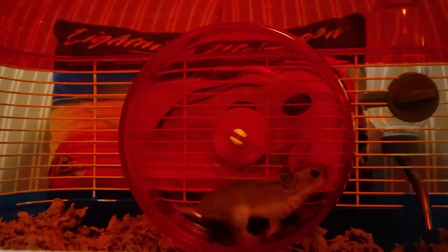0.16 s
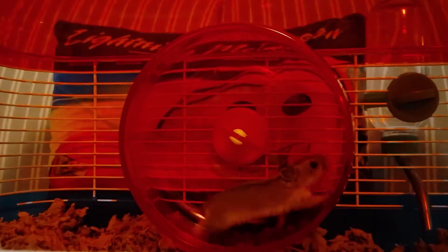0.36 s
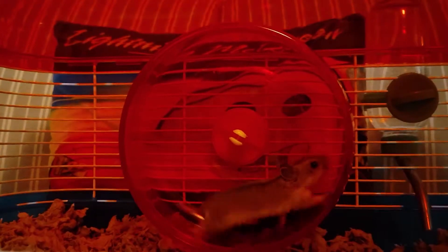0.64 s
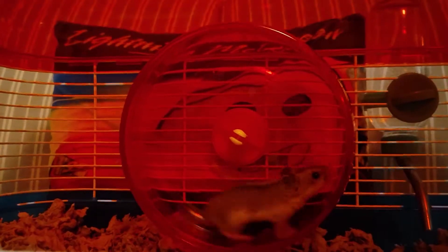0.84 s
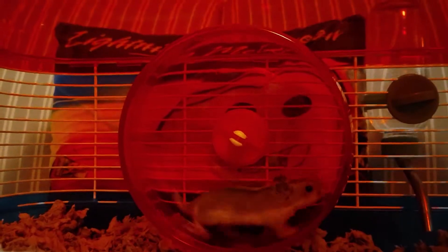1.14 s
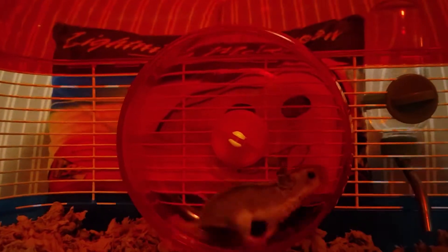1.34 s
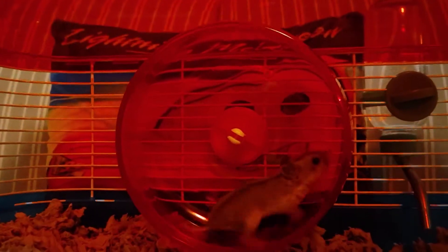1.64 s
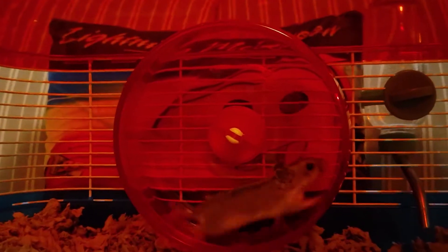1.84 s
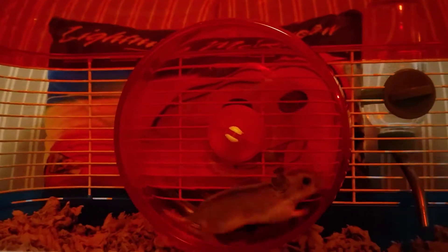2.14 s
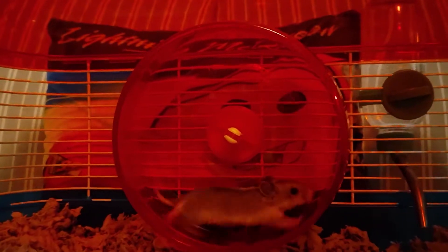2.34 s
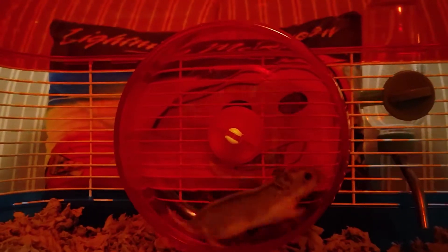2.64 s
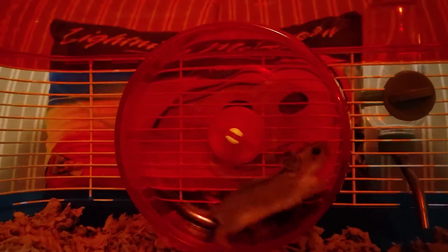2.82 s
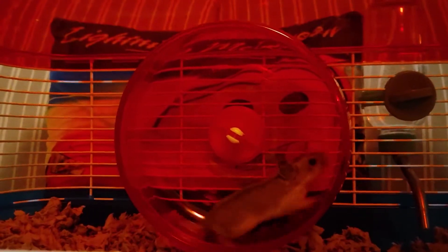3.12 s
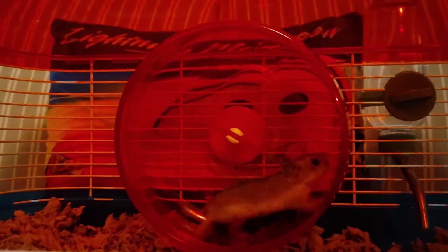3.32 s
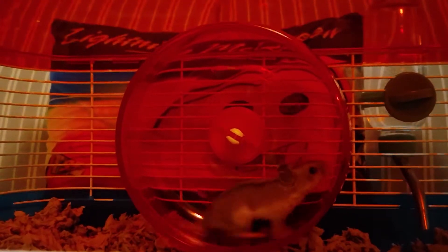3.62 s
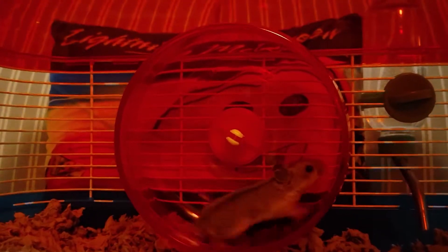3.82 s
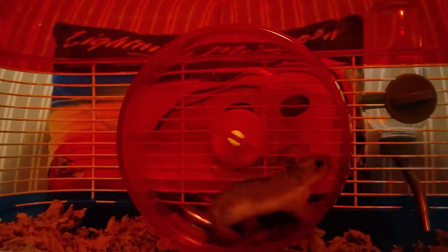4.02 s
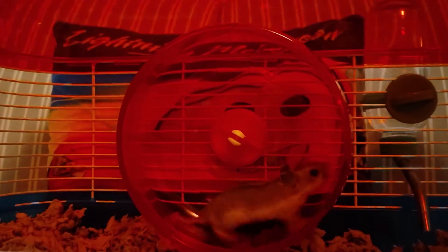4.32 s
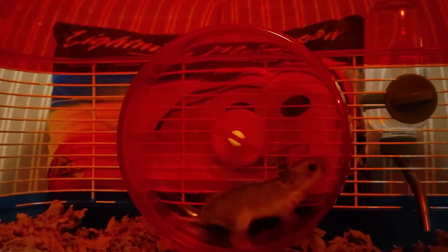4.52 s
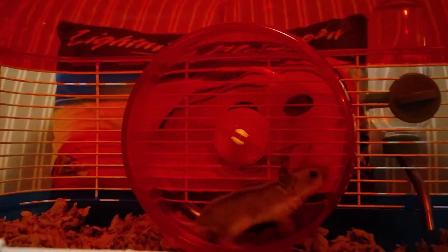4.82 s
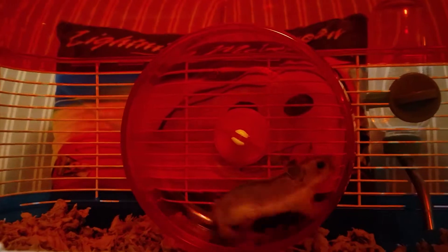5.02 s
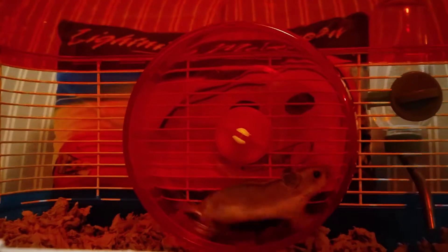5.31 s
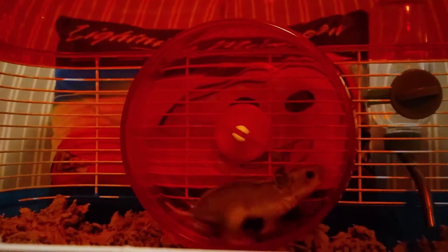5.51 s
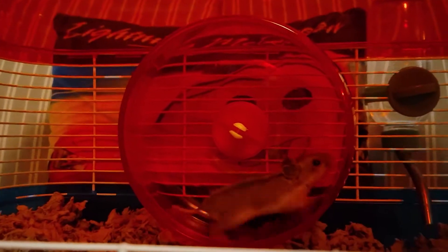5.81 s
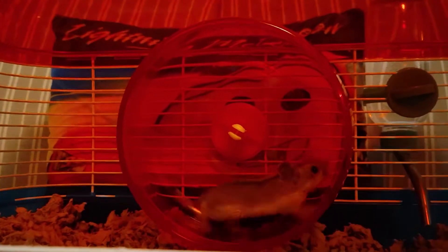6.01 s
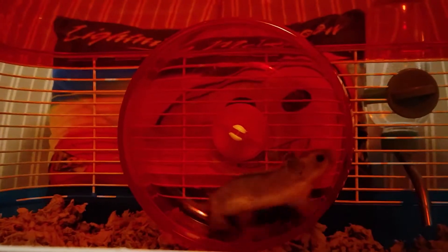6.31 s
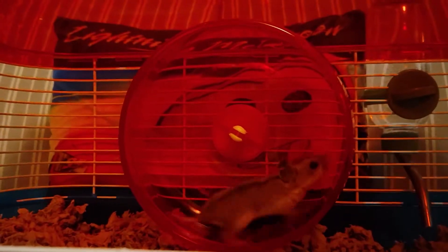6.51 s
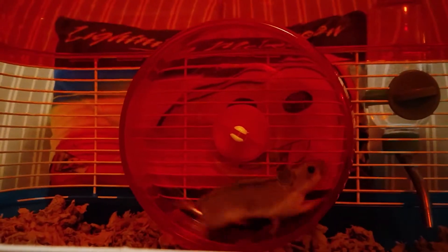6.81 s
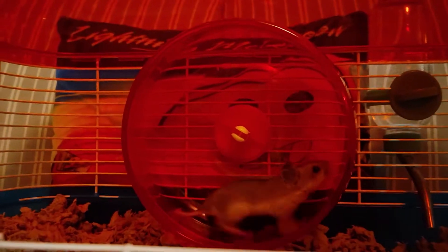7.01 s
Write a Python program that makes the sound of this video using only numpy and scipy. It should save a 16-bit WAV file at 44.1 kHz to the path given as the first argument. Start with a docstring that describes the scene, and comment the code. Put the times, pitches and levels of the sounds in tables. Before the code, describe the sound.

A small rodent runs in a loose plastic wheel, which rattles, knocks and whirrs against its wire cage in a quiet room.

```python
"""A small rodent runs in a plastic wheel fixed to a wire cage, close to a two-port microphone in a quiet room.
From the start the wheel rumbles and whirrs under hiss, shaped as noise; claws tick on the rungs as noise puffs.
The loose wheel knocks on its axle: tones ping the hub, drum, wires and cage tray, and noise cracks and jangles.
Knocks crowd from 1.2 to 2 s and again near 4.4 s; a usual blow booms most near 5.1 s. Five squeaks slip between."""
import sys
import numpy as np
from scipy import signal
from scipy.fft import rfft, irfft, next_fast_len
from scipy.io import wavfile
from scipy.ndimage import uniform_filter1d, map_coordinates

SR = 44100
rng = np.random.default_rng(int(sys.argv[2]) if len(sys.argv) > 2 else 0)


def dump_mix(stems):
    """Bounce the given channels to the path in sys.argv[1] as a 16-bit WAV at rate SR."""
    frames = np.atleast_2d(stems).T  # one column per channel
    limited = np.clip(frames, -1, 1)  # hard clip at full scale
    pcm = np.round(limited * 32767).astype(np.int16)
    wavfile.write(sys.argv[1], SR, pcm)


N = 315315

# knocks of the wheel on its axle: (time [s], upper hub ping level [dB], blow level [dB])
AXLE_KNOCKS = [(0.0734, -43.5, -49.5), (0.182, -64, -55), (0.203, -50, -62), (0.2783, -45, -47),
               (0.3251, -56, -58), (0.3838, -38, -45.5), (0.4254, -42, -45), (0.4924, -44.5, -51.5),
               (0.567, -52, -53), (0.6748, -50, -47), (0.7058, -35, -51.5), (0.7952, -71, -51),
               (0.9042, -70, -59.5), (0.9441, -46, -46), (1.0593, -72, -63), (1.1509, -49, -51.5),
               (1.1767, -48, -46.5), (1.2201, -27, -46), (1.2354, -43, -54), (1.2597, -40, -42),
               (1.3255, -39.5, -52), (1.3435, -38, -48.5), (1.4345, -43, -46), (1.4652, -25.5, -40),
               (1.5197, -34, -39.5), (1.5615, -35, -40), (1.5923, -45, -49.5), (1.629, -40.5, -47.5),
               (1.6456, -35, -47.5), (1.6707, -52, -48.5), (1.7367, -39, -43), (1.7723, -40, -47.5),
               (1.826, -39, -43.5), (1.8641, -36, -44.5), (1.9358, -34, -43), (2.0119, -49, -50.5),
               (2.0657, -56, -54), (2.101, -43, -48), (2.1728, -42.5, -52), (2.2467, -48.5, -54.5),
               (2.3343, -40.5, -51.5), (2.4137, -44, -51.5), (2.5069, -58, -60), (2.5751, -55, -59.5),
               (2.6394, -68, -65), (2.6926, -54, -46), (2.7343, -30, -49), (2.7905, -45, -51),
               (2.981, -47, -50.5), (3.054, -50, -60.5), (3.1766, -55, -52.5), (3.2147, -47, -55.5),
               (3.2809, -41.5, -48), (3.3432, -37.5, -52), (3.3847, -53, -60.5), (3.491, -37.5, -49),
               (3.5475, -38.5, -46), (3.5864, -36, -42), (3.7798, -32, -45.5), (3.8677, -54, -56),
               (3.905, -55, -60.5), (3.9669, -43, -44.5), (4.0065, -53, -42), (4.0784, -74, -61),
               (4.1969, -29.5, -46.5), (4.2597, -49.5, -56), (4.3138, -58, -61), (4.339, -42, -52),
               (4.3488, -35, -46.5), (4.3978, -34, -43), (4.4092, -33, -51), (4.4244, -49, -46),
               (4.4342, -47, -46.5), (4.487, -36, -47), (4.5461, -30.5, -47.5), (4.566, -46, -46),
               (4.578, -36, -41.5), (4.7099, -38.5, -47.5), (4.7548, -62, -47.5), (4.81, -46, -46),
               (4.9407, -51, -48.5), (5, -52, -53), (5.0798, -49, -48.5), (5.1555, -47, -47.5),
               (5.2239, -58, -57.5), (5.3544, -29, -47.5), (5.4163, -47, -51.5), (5.5026, -29.5, -43.5),
               (5.5541, -50, -46), (5.5845, -40, -53), (5.6538, -52, -45.5), (5.7553, -46, -45.5),
               (5.7849, -43, -45), (5.8618, -41.5, -47), (5.9776, -55, -48), (6.0356, -45.5, -44),
               (6.0718, -44.5, -52), (6.1327, -51, -50.5), (6.161, -53, -50.5), (6.1865, -49, -50),
               (6.2224, -54, -49), (6.3185, -67, -49.5), (6.3465, -66, -50), (6.4181, -59, -43.5),
               (6.4813, -50, -54), (6.545, -59, -66), (6.6122, -35, -46), (6.6558, -63, -48.5),
               (6.7434, -51, -48), (6.8019, -53, -42), (6.9443, -60, -52.5), (7.0205, -31.5, -47.5),
               (7.0798, -41.5, -45.5)]


def knocks():
    """Each knock pings the hub at once; drum and wires ring, and the tray swings up later and beats."""
    # modes: (centre frequency [Hz], relative level [dB], t60 [s], left minus right [dB])
    tray_modes = [(92, 2, 0.26, -1), (121.9, 5, 0.29, 1), (146.2, 5.5, 0.27, -1.5), (162, -11, 0.35, 1),
                  (189.7, -4, 0.17, 4)]
    drum_modes = [(288.3, -8.5, 0.41, 6), (305.5, -5.5, 0.34, -1), (378.4, -7, 0.12, -0.5),
                  (420.6, -16.5, 0.43, 8), (496.2, -5, 0.18, -1.5), (606, -22, 0.27, -27),
                  (722.6, -8, .13, 10.5), (867, -17, 0.21, 1), (987, -12.5, 0.1, -16.5),
                  (1049, -19, 0.21, 25), (1204, -32.5, 0.57, -24)]
    wire_modes = [(2030, -4, 0.083, 0), (2250, -3, .09, -2), (3140, -4, 0.056, 0), (3640, -19, 0.043, 4),
                  (4040, 8, .09, -5), (4030, -8, .06, -4)]
    # tray boom after a usual blow: (time [s], level [dB])
    usual_boom = [(0, -47.5), (1, -49), (2, -49), (3, -48), (4, -47.5), (4.6, -48), (5.1, -44.5),
                  (6.2, -47.5), (7.15, -49)]
    usual_blow_db, boom_growth, boom_scatter_db = -49, 0.57, 0.5  # growth: dB of boom per dB of blow
    low_ping_db, wires_db = 7.5, -16.5  # over the blow
    out = np.zeros((2, N + SR))
    t = np.arange(SR // 5) / SR
    brief = t[:SR // 20]
    fade = np.cos(np.pi / 2 * t / t[-1])
    for s, high_ping_db, blow_db in AXLE_KNOCKS:
        boom_db = np.interp(s, *np.transpose(usual_boom))
        boom_db += boom_growth * (blow_db - usual_blow_db) + boom_scatter_db * rng.standard_normal()
        # tray and drum ring loosely in step, the wires practically at random
        tray = ring(tray_modes, t, 0.0063, 0.01106, spread_db=5.0, scatter=0.4, detune=0.011)
        drum = ring(drum_modes, t, 0.0012, 0.00258, spread_db=4, scatter=0.6, detune=0.008)
        wires = ring(wire_modes, t, 0.00047, 0.001015, spread_db=7.0, scatter=3.8, detune=0.01)
        high_ping = ping(1668, -9, brief, attack=0.0012, detune=0.0036)
        low_ping = ping(1604, 11, brief, attack=0.0036, detune=0.0088)
        blow = -amp(boom_db) * tray  # the tray swings the opposite way
        blow += amp(blow_db) * drum
        blow += amp(blow_db + wires_db) * wires
        blow[:, :len(brief)] += amp(high_ping_db) * high_ping
        blow[:, :len(brief)] += amp(blow_db + low_ping_db) * low_ping
        at = round(s * SR)
        out[:, at:at + len(t)] += blow * fade
    return out[:, :N]


def ring(modes, t, attack, phase_time, spread_db, scatter, detune):
    """A blow shares energy anew over decaying modes, phases counted from phase_time [s], spread by scatter [rad]."""
    hz, db, t60, lean_db = np.transpose(modes)[..., None]
    level_chance, phase_chance = rng.standard_normal((2, len(modes), 1))
    shares = amp(db + spread_db * level_chance)
    shares *= np.linalg.norm(amp(db)) / np.linalg.norm(shares)  # same total energy each time
    turns = hz * (1 + detune * rng.standard_normal()) * (t - phase_time)
    tones = shares * amp(-60 * t / t60) * np.cos(2 * np.pi * turns + scatter * phase_chance)
    rise = (1 - np.exp(-t / attack)) ** 2
    pan = amp([lean_db[:, 0] / 2, -lean_db[:, 0] / 2])
    return rise * (pan @ tones)


def ping(hz, lean_db, t, attack, detune):
    """Close hub modes drifting apart, drawn as one sine that dies in a bell curve; a weak bounce repeats it."""
    drift, bounce_db = 0.0066, -15  # usual bell width [s], usual bounce level under the ping
    pitch, length, size, wait = rng.standard_normal(4)
    tone = np.sin(2 * np.pi * hz * (1 + detune * pitch) * t)
    tone *= (1 - np.exp(-t / attack)) ** 2
    tone *= np.exp(-(t / (drift * np.exp(0.22 * length))) ** 2)
    late = round((0.018 + 0.0053 * np.clip(wait, -2, 2)) * SR)
    tone[late:] += amp(bounce_db + 2.0 * size) * tone[:-late]
    return amp([[lean_db / 2], [-lean_db / 2]]) * tone  # lean: left minus right


def cage():
    """A quick noise crack at each knock, then wires jangle as the wheel chatters in tiny uneven bounces."""
    # noise colours of first contact and of the cage wires: (frequency [Hz], level [dB])
    crack_colour = [(300, 3.5), (2100, 1), (2700, -10), (3900, 0.5), (5000, -20), (8000, -11), (15500, -47)]
    rattle_colour = [(200, -3), (500, 1.5), (1200, -11.5), (1650, -12), (2000, -13), (2350, -16.5),
                     (2650, -23.5), (3500, -24), (3950, -19.5), (4500, -35), (15500, -42)]
    crack_db, jangle_db = -1.7, -3  # over the blow
    s, _, blow_db = np.transpose(AXLE_KNOCKS)
    crack, jangle = patchy(2.5), patchy(2.5)
    bounce_times = rng.random(900) * N / SR
    bounce_levels_db = 4.0 * np.minimum(rng.exponential(size=900), 3)
    chatter = unit(1.38 + bursts(bounce_times, bounce_levels_db, attack=0.00044, t60=0.026))
    jangle = jangle * chatter
    quick = bursts(s, blow_db + crack_db, attack=0.00012, t60=0.05)
    slow = bursts(s, blow_db + jangle_db, attack=0.0017, t60=0.27)

    def sounding(noise, envelope, spectrum):
        """Shaken noise, levelled by its steady coloured self."""
        return coloured(noise * envelope, spectrum) / np.std(coloured(noise, spectrum))

    return sounding(crack, quick, crack_colour) + sounding(jangle, slow, rattle_colour)


def claws():
    """Claws scratch the rungs: short noise ticks through the port resonances, with faint ones at random."""
    # claws on the rungs: (time [s], bright level [dB], dull part over the bright [dB])
    rung_ticks = [(0.072, -52, -4), (0.1665, -50, -16), (0.1805, -42, -16), (0.2785, -44.5, -5),
                  (0.367, -50, -10), (0.6735, -37.5, -15), (0.795, -42, -11.5), (0.9428, -48, -3),
                  (1.2754, -49, -11), (1.356, -47, -18), (1.435, -41.5, -10), (1.5605, -45, -8),
                  (1.6053, -38.5, -27), (1.7185, -48, -7), (1.736, -39, -16), (2.066, -43.5, -11),
                  (2.6943, -51, -4), (2.9817, -43.5, -11), (3.158, -49.5, -7), (3.5833, -42, -8),
                  (3.8691, -53, -3.5), (3.9684, -47, -11), (4.0294, -43, -9), (4.0974, -50, -6),
                  (4.3505, -47, -6), (4.395, -40, -7), (4.4498, -48, -24), (4.6578, -52, -11),
                  (4.8259, -52, -17), (5.0285, -48, -5.5), (5.4859, -47, -8), (5.9414, -49, -10),
                  (6.7997, -41, -8), (6.982, -45.5, -12)]
    s, db, dull_over_db = np.transpose(rung_ticks)
    grit_db, attack = 2.5, 0.0015  # attack in seconds
    when, size = rng.random((2, 260))
    faint_db = -62 - 6 * np.log(size + 0.062)
    faint = bursts(when * N / SR, faint_db, attack, t60=0.033)
    ticks = bursts(s, db, attack, t60=0.037)
    tails = bursts(s, db + dull_over_db, attack, t60=0.15)
    bright = filtered(patchy(grit_db) * (faint + ticks), lambda hz: 1 / (1 + (8000 / (hz + 1)) ** 8))
    dull = filtered(patchy(grit_db) * tails, lambda hz: 1 / (1 + (hz / 7500) ** 8))
    return port_colour(bright + dull)


def scrapes():
    """A claw slips on the plastic: a short squeak, a sine whose phase wanders."""
    # squeaks: (time [s], level before the envelope [dB], mean pitch [Hz])
    squeaks = [(0.653, -56, 3520), (1.108, -58, 2920), (1.720, -54, 3600), (3.16, -58, 3000),
               (5.739, -61, 2900)]
    out = np.zeros((2, N))
    t = np.arange(SR // 30) / SR
    envelope = (1 - np.exp(-t / 0.00086)) * np.exp(-(t / 0.012) ** 2)
    for s, db, hz in squeaks:
        waver = np.cumsum(rng.standard_normal(len(t))) * 0.12  # radians
        at = round(s * SR)
        out[:, at:at + len(t)] += amp(db) * np.sin(2 * np.pi * hz * t + waver) * envelope
    return out


def rolling():
    """Paws and bearing keep tray and drum murmuring as coloured noise; the hiss shares part of their patter."""
    # levels before the patter: (time [s], whirr level [dB], hiss level [dB])
    roll_levels = [(0, -66, -64.5), (1.7, -65, -64.5), (2.3, -68.5, -65), (4.4, -63.5, -63.5),
                   (7.15, -65, -63)]
    # noise colours: (frequency [Hz], relative level [dB])
    rumble_colour = [(15, -54), (25, -30), (89, -1.5), (123, 0.5), (161, -3), (231, -15), (260, -32),
                     (340, -82), (570, -120)]
    whirr_colour = [(140, -48), (230, -5), (294, 1.5), (346, 5.5), (402, -15), (543, -3), (750, -2),
                    (1140, -12.5), (1430, -20), (1630, -1.5), (1890, -13.5), (2550, -23), (3000, -11.5),
                    (3900, -70), (6600, -120)]
    s, *columns = np.transpose(roll_levels)
    whirr_db, hiss_db = [np.interp(np.arange(N) / SR, s, column) for column in columns]
    patter_db = 2.5 * wobble(20)
    rumble = unit(coloured(rng.standard_normal((2, N)), rumble_colour))
    whirr = unit(coloured(rng.standard_normal((2, N)), whirr_colour))
    hiss = unit(port_colour(patchy(1.5)))
    out = amp(-63 + patter_db) * rumble
    out += amp(whirr_db + patter_db) * whirr
    return out + amp(hiss_db + 0.58 * patter_db) * hiss


def port_colour(x):
    """Each microphone port has its own treble resonances."""
    # treble colour of each port: (frequency [Hz], level [dB])
    left_port = [(1500, -19), (2700, -6), (3600, 9), (3950, 10.5), (4300, 8), (4900, 1.5), (6000, 7.5),
                 (7000, 1.5), (9000, -6.5), (15800, -8)]
    right_port = [(1500, -1.5), (2700, -10), (3600, 0), (3930, 12), (4300, 1.5), (4900, 0.5), (6700, 2),
                  (8000, -4.5), (10300, 3.5), (10900, 5), (11350, 10.5), (11900, 5.5), (12400, 7.5),
                  (13200, 5), (14500, -8), (15800, -4)]
    return filtered(x, lambda hz: amp([along(left_port, hz), along(right_port, hz)]))


def coloured(pair, spectrum):
    """Two unrelated signals given a spectrum and mixed to the left-right likeness of the room."""
    # likeness of the two channels: (frequency [Hz], correlation [-1 to 1])
    likeness = [(60, 0.65), (330, 0.94), (500, 0.61), (770, 0.76), (1200, 0.028), (2700, 0.017)]

    def mid_and_side(hz):
        turn = np.arccos(np.clip(along(likeness, hz), -1, 1)) / 2
        return amp(along(spectrum, hz)) * [np.cos(turn), np.sin(turn)]

    mid, side = filtered(pair, mid_and_side)
    return np.array([mid + side, mid - side])


def patchy(depth_db):
    """Two unrelated noises, together of rms 1, with patches of random gain in time and frequency."""
    z = signal.stft(rng.standard_normal((2, N)), nperseg=256)[2]
    field = uniform_filter1d(rng.standard_normal(z.shape), size=5, axis=1)  # over frequency
    field = uniform_filter1d(field, size=4, axis=2)  # over time
    noise = signal.istft(z * amp(depth_db * unit(field)), nperseg=256)[1]
    return unit(noise[:, :N])


def bursts(times, levels_db, attack, t60):
    """Envelope of noise puffs: each kick rises with attack [s] and decays 60 dB in t60 [s]."""
    t = np.arange(SR // 4) / SR
    kicks = np.zeros(N)
    at = np.clip(np.round(times * SR).astype(int), 0, N - 1)
    np.add.at(kicks, at, amp(levels_db))
    return signal.fftconvolve(kicks, (1 - np.exp(-t / attack)) * amp(-60 * t / t60))[:N]


def wobble(rate):
    """A smooth random curve, rate knots a second."""
    knots = rng.standard_normal(int(N * rate / SR) + 4)
    return map_coordinates(knots, [np.arange(N) * rate / SR])


def filtered(x, response):
    """x times a response of frequency."""
    m = next_fast_len(N + SR // 2)
    return irfft(rfft(x, m) * response(np.fft.rfftfreq(m, 1 / SR)), m)[..., :N]


def along(points, hz):
    """(frequency, value) points read on a log frequency axis."""
    f, v = np.transpose(points)
    return np.interp(np.log(hz + 1), np.log(f + 1), v)


def amp(db):
    """Gain of a level in dB."""
    return 10 ** (np.asarray(db) / 20)


def unit(x):
    """Scaled to rms 1."""
    return x / np.sqrt(np.mean(x ** 2) + 1e-20)


def scene():
    """Wheel, cage and claws over the rolling sounds."""
    return knocks() + cage() + claws() + scrapes() + rolling()


def record(dry):
    """The right port hears slightly later, the left is shaded; deep bass is weak and the top is cut off."""
    # the left port is partly shielded: (frequency [Hz], level [dB])
    left_shade = [(470, -1.5), (540, -7), (680, -3.5), (1500, -2)]
    top_hz, bass_corner_hz = 15780, 60
    lag = np.array([[-1.5], [1.5]]) / SR  # seconds, left and right

    def microphone(hz):
        bass = (1j * hz / (bass_corner_hz + 1j * hz)) ** 2
        shade = amp([along(left_shade, hz), 0 * hz])
        return (hz < top_hz) * bass * shade * np.exp(-2j * np.pi * hz * lag)

    return filtered(dry, microphone)


dry = scene()
out = record(dry)
dump_mix(out)
```